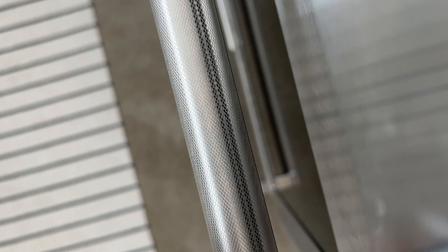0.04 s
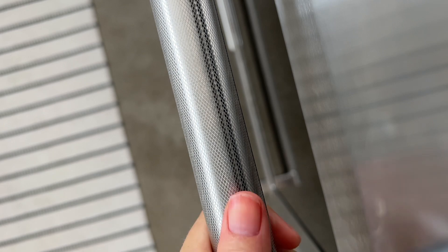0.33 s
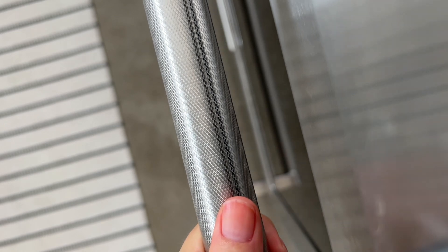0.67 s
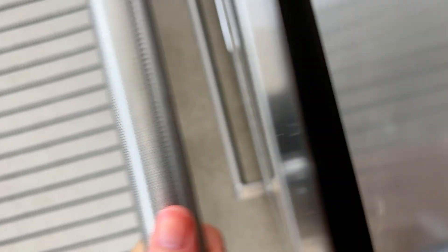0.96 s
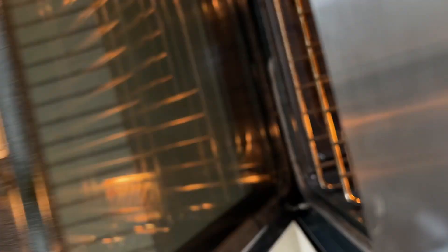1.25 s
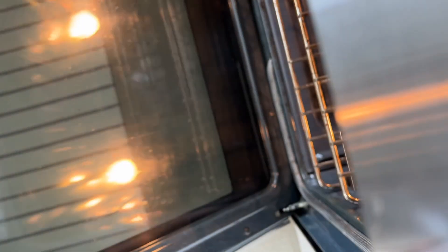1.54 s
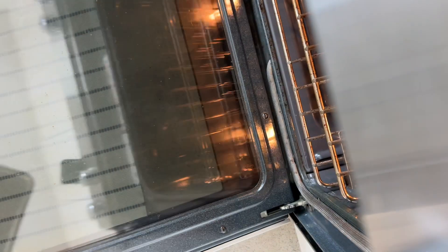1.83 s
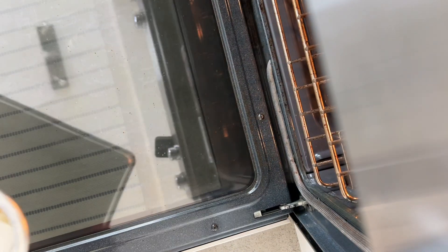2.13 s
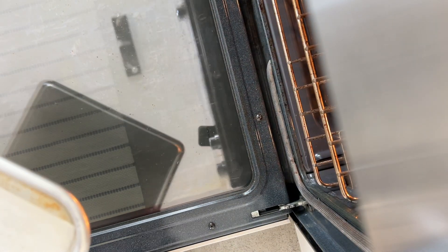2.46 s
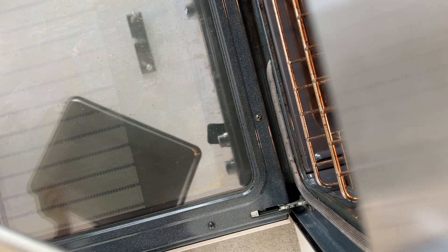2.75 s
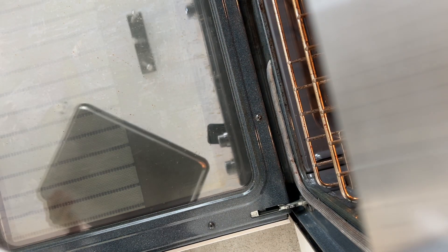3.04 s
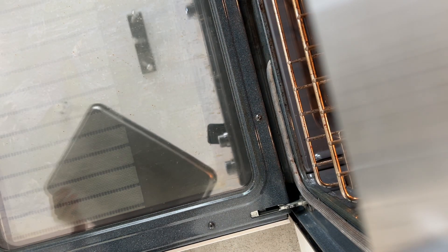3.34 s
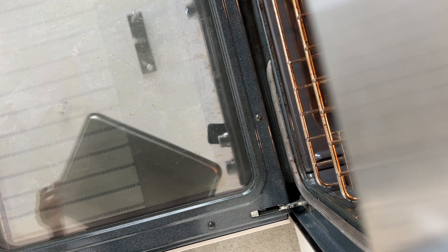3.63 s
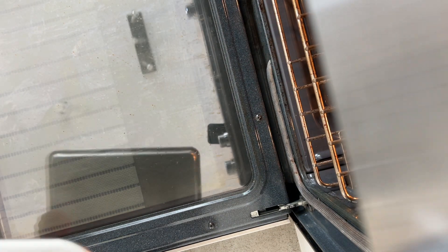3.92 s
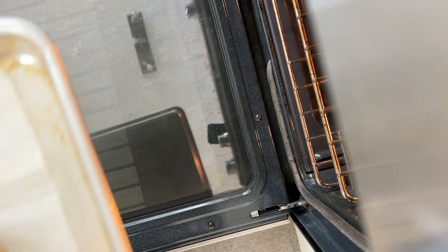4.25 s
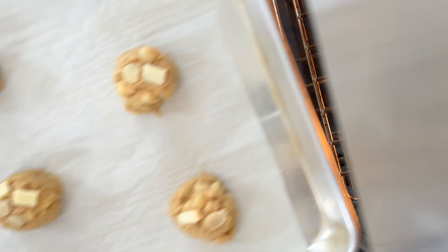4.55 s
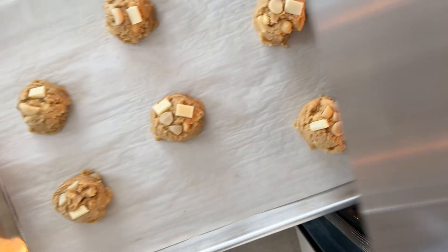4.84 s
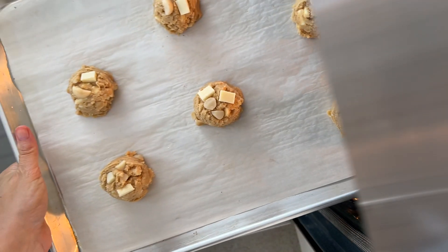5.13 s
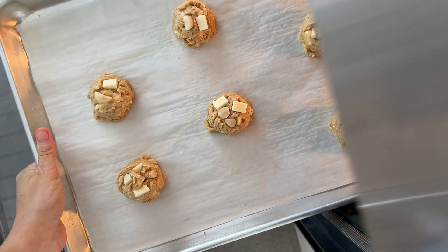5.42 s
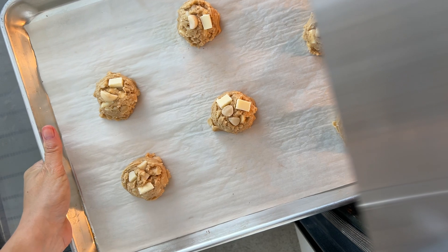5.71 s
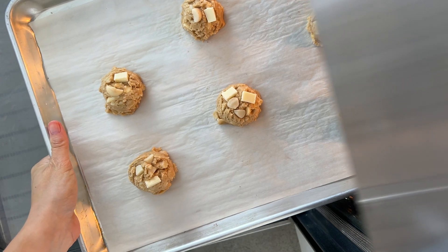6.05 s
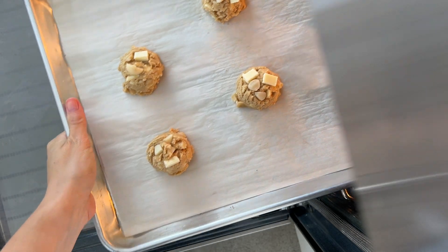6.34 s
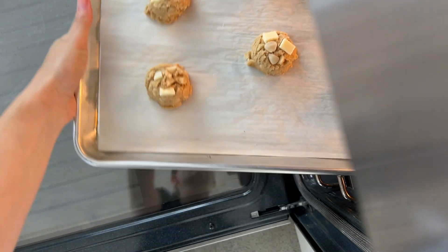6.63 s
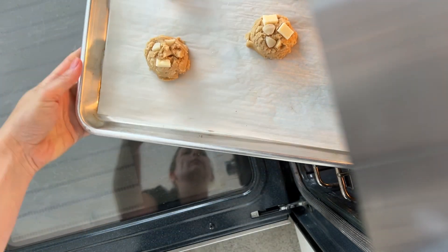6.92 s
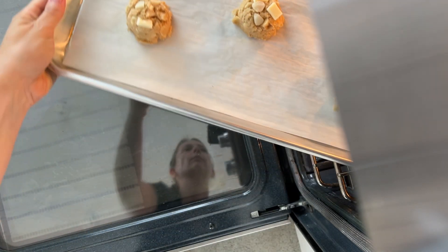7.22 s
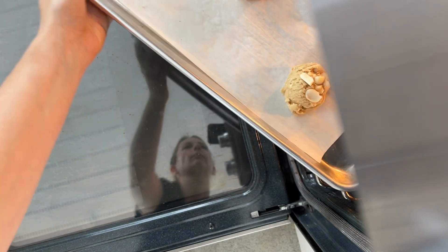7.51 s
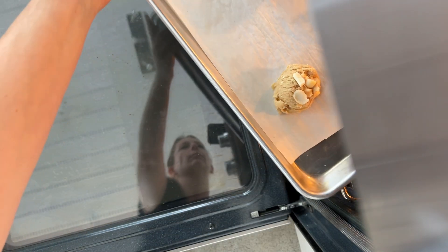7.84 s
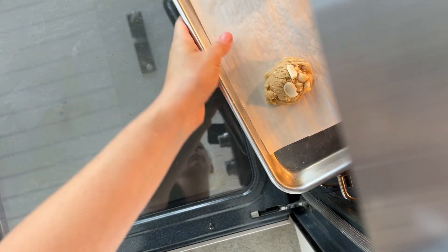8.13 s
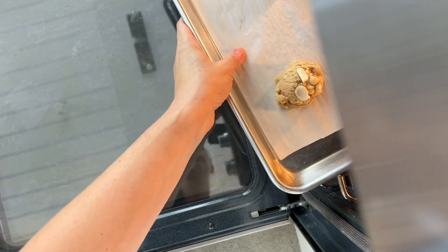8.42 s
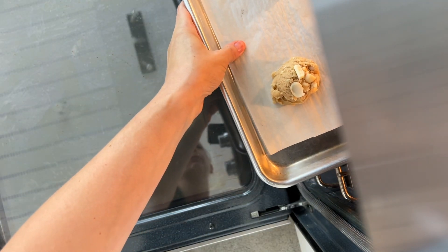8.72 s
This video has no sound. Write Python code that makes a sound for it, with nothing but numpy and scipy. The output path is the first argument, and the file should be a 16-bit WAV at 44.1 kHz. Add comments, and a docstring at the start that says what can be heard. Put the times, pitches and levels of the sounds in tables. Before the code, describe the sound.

A low fan noise and electrical hum fill a kitchen. Fingers rub a handle, and an oven door opens with knocks, a pop and a faint hinge whine. Sleeves swish, feet shuffle, and a baking pan is lifted with hollow knocks and a paper rustle. The pan clatters loudly onto the wire rack, bumps it twice and scrapes along the wires as it is pushed in, all close to the microphone.

```python
"""In a kitchen filled with fan noise and mains hum, fingers slide round the handle of an oven door.
Springs knock, the seal pops free and the hinge rubs and whines as the door swings open.
Sleeves swish close by, feet shuffle aside, and a baking pan is lifted with hollow knocks and a rustle
of paper. The pan clatters onto the wire rack, its sheet metal flexing and ringing between the oven's
steel walls; it scrapes along the wires, bumps the rack twice and is pushed home."""
import sys
import numpy as np
from scipy import signal
from scipy.fft import rfft, irfft, next_fast_len
from scipy.io import wavfile

SR = 44100
rng = np.random.default_rng(int(sys.argv[2]) if len(sys.argv) > 2 else 0)


def store_pcm(level_fs):
    """Save levels as 16-bit WAV."""
    pcm = np.round(np.clip(level_fs, -1, 1) * 32767).astype(np.int16)
    wavfile.write(sys.argv[1], SR, np.atleast_2d(pcm).T)


N = 395577
TIME = np.arange(N) / SR
OCTAVES_HZ = 50 * 2. ** np.arange(9)

# Envelopes of the fan noise and the mains hum: (time [s], level [dB])
FAN_LEVEL = [(0, -40.5), (2.9, -41.5), (3.2, -43), (4.2, -42.5), (4.4, -41.5), (5.4, -42.5), (8.97, -40)]
HUM_LEVEL = [(0, -41), (.7, -39.5), (1.9, -44), (2.2, -52), (3.2, -51.5), (4.2, -48), (5.2, -44.5),
             (8.97, -47)]
# Partials of the hum: (frequency [Hz], relative level [dB])
HUM_PARTIALS = [(120, 1.5), (240, -19.5), (361, -20), (480, -33)]

# Noise spectra: (frequency [Hz], relative spectral density [dB])
FAN_SPECTRUM = [(15, -29), (25, -26.5), (49, 8), (123, -8), (180, -16), (217, -15.5), (326, -19),
                (363, -14.5), (463, -17), (641, -20.5), (1230, -32.5), (7920, -63.5), (10400, -64.5),
                (12000, -63), (15000, -57), (16000, -77)]
GRIP_SPECTRUM = [(300, -4), (800, 1), (1600, -2.5), (3500, -7), (5200, -2), (6400, 1.5), (7500, -7.5),
                 (9000, -5), (12000, -10), (16000, -17)]
HINGE_SPECTRUM = [(200, -3.5), (500, 1.5), (1000, -0.5), (2000, -12), (3400, -18), (4500, -19),
                  (8000, -22.5), (15000, -31.5)]
SLEEVE_SPECTRUM = [(200, -2), (600, 13), (1500, 6), (3500, 2.5), (7000, 6), (9000, 2.5), (12500, 6),
                   (16000, -3)]
FLOOR_SPECTRUM = [(20, -10), (35, -7), (58, 2.5), (85, -12.5), (140, -15), (300, -37.5), (1000, -85),
                  (16000, -120)]
PAPER_SPECTRUM = [(200, -3), (1500, 3), (3500, -2.5), (7000, 4), (9000, 4.5), (12500, 6), (15000, 5),
                  (16000, 7.5)]
SLIDE_SPECTRUM = [(80, 22), (200, 13.5), (430, 0), (700, 8), (1200, 2), (2500, -4), (5000, -13),
                  (14000, -64.5)]
# Resonances excited by friction: (frequency [Hz], bandwidth [Hz], gain [dB])
HINGE_RESONANCES = [(4700, 1000, 2.8), (11400, 690, 8.2)]
SLEEVE_RESONANCES = [(6370, 140, 0.46), (8350, 230, 1.1)]
SLIDE_RESONANCES = [(336, 50, 14.5), (402, 40, 15.5), (490, 30, 7), (1150, 120, 5.5), (1650, 200, 1),
                    (2620, 1100, 4)]
# Rubbing strokes: (peak time [s], relative level [dB], rise [s], fall [s])
GRIP_STROKES = [(.12, -71, 0.018, 0.066), (.225, -45.5, 0.096, 0.12)]
HINGE_STROKES = [(.77, -52, 0.3, 0.12), (.895, -39.5, .012, 0.079), (1.08, -51.5, 0.27, 0.17),
                 (1.42, -55, .2, 0.6), (1.86, -53, .2, 0.36)]
SLEEVE_STROKES = [(1.86, -61.5, 0.14, 0.038), (2.56, -63.5, 0.034, 0.19), (2.92, -49, 0.12, 0.11),
                  (3.12, -48, 0.11, 0.1), (6.07, -60.5, 0.2, 0.61), (6.41, -48, 0.1, 0.36),
                  (6.76, -50.5, 0.13, 0.081), (7.06, -51, 0.085, 0.58), (7.48, -42, 0.04, 0.055),
                  (7.84, -46.5, 0.24, 0.16), (8.11, -57.5, 0.015, 0.056), (8.245, -53, .015, 0.03),
                  (8.33, -47.5, 0.039, 0.084), (8.96, -52.5, 0.4, .1)]
FOOT_STROKES = [(2.1, -37, 0.063, 0.15), (2.9, -35, 0.96, 0.19), (4.7, -41, 0.45, 0.94)]
PAPER_STROKES = [(3.555, -49.5, 0.11, .035), (3.632, -52, 0.03, 0.038), (3.715, -56, 0.04, 0.039),
                 (3.83, -47, 0.021, 0.073), (4.15, -58.5, 0.095, 0.22)]
PAN_PUSHES = [(5.95, -48.5, 0.14, 0.59), (6.42, -43.5, 0.44, 1), (7.24, -33.5, 0.1, 0.14),
              (7.43, -28.5, 0.032, 0.16), (7.82, -39, 0.28, 0.06), (8.33, -54.5, 0.082, 0.21),
              (8.93, -49, 0.32, 0.31)]
# Narrow friction bands of the hinge, and of the pan's rim on the wires:
# (time [s], duration [s], level [dB], start frequency [Hz], end frequency [Hz], bandwidth [Hz])
HINGE_WHINES = [(1.24, 0.069, -63, 4700, 4850, 150), (1.27, 0.18, -62, 11400, 11400, 450),
                (1.3, 0.27, -72, 4260, 4150, 70), (1.57, 0.18, -63, 11400, 11300, 600),
                (1.65, 0.15, -64, 4450, 4400, 120), (1.75, 0.094, -63.5, 11400, 11300, 700),
                (1.79, 0.22, -66, 4120, 3850, 330), (1.75, 0.48, -71.5, 4920, 5250, 200)]
RIM_SCRAPES = [(5.8, .35, -60.5, 3200, 2740, 600), (6.02, .4, -61, 2800, 2350, 450),
               (6.36, 0.12, -52, 1650, 1720, 220), (7.40, 0.15, -47, 1600, 1575, 160),
               (7.815, .04, -51, 1730, 1600, 500), (7.88, .05, -55, 1520, 1400, 700)]

# Snaps of fingers, sleeves and paper: (time [s], force [dB], tilt [dB/octave])
SNAPS = [(0.055, -16, -2.5), (0.102, 5.5, -8), (.621, -28.5, 2), (0.696, -26, 2), (0.905, -20, 4.5),
         (1.171, -22.5, 5), (1.269, -38, 5), (2.529, -5, -5.5), (2.635, -4.5, -4.5), (2.658, -0.5, -1.5),
         (2.682, -3, 1.5), (2.806, -11, 3), (2.822, -10, 3), (2.905, -6.5, 3), (2.973, -6, 0),
         (3.32, -40.5, 2.5), (4.405, -6.5, -7), (4.482, -28, -1), (4.496, -43, 7), (4.667, -15, -5.5),
         (5.007, -16.5, -14.5), (7.28, -19, 3.5), (8.241, -4, -1), (8.309, -3, 1.5), (8.322, 6, -1),
         (8.394, -7, 0), (8.806, -16, 1)]
# Impacts: (time [s], force [dB], bass gain [dB], tilt [dB/octave])
DOOR_KNOCKS = [(.568, -11.5, -57, 1.5), (.751, -21.5, 21.5, 1.5), (.886, -13, 0.5, -4),
               (1.148, -25.5, 6, 4.5), (1.172, -5, 23, 0.5), (1.505, 1, -2.5, 2.23), (1.510, -6.5, -19, -5),
               (1.994, -16.5, -18.5, 2.4)]
SEAL_POPS = [(.667, 1, -13.5, -3)]
LIFT_KNOCKS = [(3.476, 1, -8, -1.3), (4.040, -9, 9, 1), (4.517, -22, 4, 0), (5.008, -19, -3, 0.41)]
PAN_CLANKS = [(5.440, 0, -0.5, 0), (5.480, -2, -5, -0.1), (5.508, -15, 7, -2.2), (5.530, -11.5, -7, -0.7),
              (5.564, -2.5, -16, 0.4), (5.576, -15, -8, 2), (5.603, -6.5, 4, -0.6), (5.642, -8, 1, 0.4),
              (5.744, -14.5, -5, -0.3), (5.825, -21.5, 1.5, -2), (5.884, -26, -5.5, -5),
              (5.924, -22.5, 7, -1), (6.354, -38, -9.5, -5), (6.408, -24, -14, 0.3),
              (7.399, -12.5, -7, 0.5), (7.435, -20.5, 24, 1.7), (7.485, -9, -3, 1), (7.492, -22, -2, -4),
              (7.524, -16.5, -12.5, -6.5), (7.563, -17, -1, -1.5), (7.827, -18.5, 1, -0.5),
              (7.895, -20.5, -1, -0.5), (7.992, -26.5, 16, 1.5), (8.025, -36, 5, -2.5),
              (8.103, -30, -5, -3)]
RACK_BUMPS = [(6.690, -1.9, 2, 0.203), (7.081, 0.38, 0.42, 0.92)]
# Dense response of each struck body, by band: (frequency [Hz], relative level [dB], tail T60 [s])
SNAP_BANDS = [(100, -55, 0.19), (400, -81, 0.35), (1600, -56, 0.23), (3120, -55.5, 0.33),
              (6830, -44.5, 0.28), (12940, -45.5, 0.087)]
DOOR_BANDS = [(51.6, -53, 0.88), (101, -40.5, 0.44), (200, -45, 0.97), (403, -37, 0.4), (800, -34.5, 0.57),
              (1590, -39, 0.66), (3200, -46, 0.68), (6350, -51, 0.53), (12900, -60.5, 0.19)]
SEAL_BANDS = [(49, -62, .3), (104, -34.5, 1), (200, -43.5, 1), (400, -44.5, 1), (795, -44, 0.76),
              (1580, -44.5, 0.71), (3200, -56.5, .3), (6400, -60, 0.82), (12800, -57.5, 0.44)]
LIFT_BANDS = [(100, -80, .3), (200, -47, 0.14), (400, -49, 1), (800, -48.5, 0.48), (1630, -53, 0.61),
              (3200, -64, 0.27), (6400, -70.5, .2), (12900, -61, .2)]
PAN_BANDS = [(51, -50, .3), (99, -31, 0.98), (200, -31.5, 0.77), (400, -29, 0.32), (797, -29.5, 0.73),
             (1600, -30, 0.46), (3200, -34, 0.51), (6400, -36, 0.43), (12700, -32.5, 0.16)]
RACK_BANDS = [(52, -48, 0.43), (106, -36, 0.65), (200, -31, 0.65), (400, -31, 1), (757, -28, 0.65),
              (1600, -32, 0.47), (3200, -34, 0.39), (6400, -45.5, 0.33), (12700, -38, 0.13)]
# Its strongest normal modes: (frequency [Hz], relative level [dB], T60 [s])
SNAP_MODES = [(5140, -40.5, 0.062), (7780, -39, 0.041), (8350, -39.5, 0.033), (13150, -46, 0.034)]
DOOR_MODES = [(193, -46, .45), (456, -30.5, 0.25), (549, -48, 0.5), (800, -35, 0.39), (622, -37, 0.6),
              (911, -33, 0.15), (1160, -35, 0.38), (1190, -58, 0.3), (1880, -36, 0.1), (2616, -52, 0.24),
              (3520, -48.5, 0.32), (3790, -43, .1), (5070, -47, 0.083)]
SEAL_MODES = [(200, -37, 0.79), (800, -32, 0.19), (890, -30, 0.12), (1305, -31, 0.086),
              (1860, -19.5, 0.025)]
LIFT_MODES = [(246, -36.5, 0.32), (292, -29, 0.16), (330, -35.5, 0.34), (937, -56, 0.19), (2000, -59, .25)]
PAN_MODES = [(155, -37.5, 1.6), (197.7, -32.5, 0.4), (284, -36.5, 0.82), (305.5, -22, 0.13),
             (352, -40.5, 1.4), (386, -42.5, 2.65), (440, -37.5, 2.2), (459, -28.5, 0.49), (489, -37, 1.15),
             (620, -47, .7), (664, -47, .9), (734, -49, .6), (1008, -42.5, 1.4), (1180, -45.5, 1.9),
             (1280, -54, 1), (1475, -47.5, 0.6), (1583, -40, 0.5), (2308, -51, .6)]
RACK_MODES = [(98.4, -25.5, 0.76), (196, -19.5, 0.49), (326, -20.5, 0.39), (373, -25, 0.53),
              (456, -24.5, 0.37), (510, -29, 0.35), (813, -30.5, 0.57), (1010, -26.5, 0.14),
              (1035, -33, 0.53), (2024, -33.5, 0.23), (2100, -29, 0.1), (2430, -22.5, 0.058),
              (2850, -26.5, .06), (3150, -42.5, .4), (3620, -38, 0.1), (4059, -47, 0.23),
              (6080, -37, 0.075), (6740, -36.5, .09)]

# Thuds of feet and of the swinging door: (time [s], level [dB], frequency [Hz], twice the rise time [s])
THUDS = [(0.735, -27, 94, 0.017), (0.826, -27, 126, 0.031), (0.894, -28, 71.3, 0.047),
         (1.181, -35, 71.5, 0.21), (1.232, -21.5, 74, 0.029), (1.241, -31, 124.7, 0.044),
         (2.362, -17, 97, 0.0074), (2.695, -19, 79.5, 0.023), (2.768, -19.5, 64.5, 0.0069),
         (3.994, -33.5, 101, 0.01), (8.009, -31.5, 72.5, 0.019)]
# Squeaks of fingers and wires on the pan: (time [s], level [dB], frequency [Hz])
PAN_SQUEAKS = [(4.403, -56, 1650), (4.416, -50.5, 1540), (4.478, -45, 1480), (4.492, -54, 1510),
               (7.99, -44.5, 1860)]
# Flexing of the sheet: (time [s], level [dB], start frequency [Hz], end frequency [Hz], rise [s])
PAN_FLEXES = [(5.44, -13, 510, 275, 0.0055), (5.480, -15.5, 594, 353, 0.0031),
              (5.505, -13.5, 200, 100, 0.0043), (5.564, -16.5, 584, 332, 0.004),
              (5.602, -21.5, 410, 164, 0.009), (5.64, -18, 600, 400, .004),
              (6.693, -14.5, 478, 83.4, 0.0134), (6.777, -19, 130, 89, 0.015),
              (7.084, -13, 478, 263, 0.0064), (7.101, -13, 200, 88, 0.0062)]

# Likeness of the two microphone ports: (frequency [Hz], coherence [0-1])
PORT_COHERENCE = [(60, 0.97), (130, 0.66), (350, 0.9), (550, 1), (900, 0.27), (1300, 1), (2000, 0.35),
                  (3000, 0.65), (3900, 0.096), (5000, 0.07), (6000, 0.12), (8000, 0.94), (12000, 1),
                  (16000, 0.56)]
# Left port relative to right: (frequency [Hz], level [dB]) and (frequency [Hz], phase lead [rad])
PORT_BALANCE = [(50, -1), (130, -0.5), (220, 0), (400, 1.5), (900, 1.5), (1300, 1), (3200, 1), (5500, 5),
                (9000, 0), (15000, -1)]
PORT_PHASE = [(40, .1), (100, 0.53), (220, 0.99), (350, 0.99), (520, 0.97), (700, 2.33), (1000, 4.12),
              (1500, 4.54), (2300, 7.6), (3500, 7), (4100, 24), (5000, 13), (6400, 20.4), (7200, 18.9),
              (8000, 17.94), (9500, 15.75), (11500, 14.67), (13000, 9.2), (16000, 12)]
# The microphone's treble notch: (frequency [Hz], gain [dB])
MIC_NOTCH = [(8300, -2.5), (9100, -0.5), (9700, -6), (10300, -20), (10900, 1.5), (11500, -0.5)]


def amp(db):
    """Decibels as an amplitude ratio."""
    return 10 ** (np.asarray(db) / 20)


def unit_rms(x):
    """Normalisation to unit power."""
    return x / np.sqrt(np.mean(x ** 2) + 1e-20)


def read(points, hz, column=1):
    """Interpolation of a table column over log frequency."""
    table = np.transpose(points)
    return np.interp(np.log(hz + 1), np.log(table[0] + 1), table[column])


def envelope(curve):
    """Gain over time, interpolated in decibels."""
    return amp(np.interp(TIME, *np.transpose(curve), left=-120, right=-120))


def add(mix, s, sound):
    """Superposition of a sound starting at s seconds."""
    part = mix[:, max(round(s * SR), 0):][:, :sound.shape[-1]]
    part += sound[..., :part.shape[1]]


def coloured(x, spectrum, resonances=()):
    """Linear filtering by a spectrum with resonance peaks standing on it."""
    size = next_fast_len(N + 4096)
    hz = np.fft.rfftfreq(size, 1 / SR)
    peaks_db = sum(db / (1 + (2 * (hz - f) / width) ** 2) for f, width, db in resonances)
    return irfft(rfft(x, size) * amp(read(spectrum, hz) + peaks_db), size)[:, :N]


def drift(rate_hz):
    """Slow random modulation of about unit size."""
    knots = np.arange(0, 10, 1 / rate_hz)
    return np.interp(TIME, knots, rng.standard_normal(4096)[:len(knots)])


def octave_noise(size=65536):
    """Noise split into octave bands of unit power, indexed by band, channel and sample."""
    octave = np.log2(np.fft.rfftfreq(size, 1 / SR) / OCTAVES_HZ[0] + 1e-6)
    offset = np.clip(octave, -1, len(OCTAVES_HZ) - 1) - np.arange(len(OCTAVES_HZ))[:, None]
    shares = np.cos(np.pi / 2 * np.clip(offset, -1, 1))
    noise = rfft(rng.standard_normal((2, size), dtype=np.float32))
    return np.array([unit_rms(irfft(noise * share)) for share in np.float32(shares)])


def struck(blows, bands, modes, crack_t60, tail_db, rise_cycles, modes_db=0, detune=0, rattle_hz=0):
    """Impact excitation: each blow gives a crack, a dense tail of panels and room, and damped modes."""
    t, noise, out = np.arange(SR) / SR, octave_noise(), np.zeros((2, N))
    hz = OCTAVES_HZ[:, None]
    crack = amp(-60 * t / (crack_t60 * (1000 / hz) ** 0.06))  # the treble dies first
    tail = amp(tail_db - 60 * t / read(bands, hz, column=2))
    shape = np.hypot(crack, tail) * (1 - np.exp(-t * hz / rise_cycles))  # the bass builds up later
    onset_rms = np.sqrt(np.mean(shape[:, :SR // 25] ** 2, 1, keepdims=True))
    shape *= amp(read(bands, hz)) / onset_rms
    touches = np.arange(0, 1, .012)
    for s, force_db, bass_db, tilt_db in blows:
        def strength(f):
            return amp(force_db + bass_db / (1 + (f / 230) ** 3) + tilt_db * np.log2(f / 1000))
        start = int(rng.random() * (noise.shape[-1] - SR))
        sound = np.einsum("bt,bct->ct", shape * strength(hz), noise[..., start:start + SR])
        for f, db, t60 in modes:
            age = t[:int(t60 * SR)]
            # the higher a mode, the more it matters where the blow lands
            spot_db = np.clip(f / 400, 1, 4) * rng.uniform(-1.48, 1)
            ring = amp(db + modes_db + spot_db - 60 * age / t60) * (1 - np.exp(-age * f / rise_cycles))
            pitch = f * (1 + detune * rng.uniform(-0.95, 1))
            jitter = rattle_hz * np.interp(age, touches, rng.standard_normal(len(touches)))
            cycles = np.cumsum(pitch + jitter) / SR + rng.random((2, 1))
            sound[:, :len(age)] += strength(f) * ring * np.sin(2 * np.pi * cycles)
        add(out, s, sound)
    return out


def strokes(rows, drop_db=11.5, roundness=1.3):
    """Incoherent strokes add in power; each is drop_db down one rise before and one fall after its peak."""
    t = np.linspace(0, TIME[-1], 4096)
    s, db, rise, fall = np.transpose(rows)[:, :, None]
    from_peak = np.maximum((s - t) / rise, (t - s) / fall)
    gains = amp(db - drop_db * from_peak ** roundness)
    return np.interp(TIME, t, np.linalg.norm(gains, axis=0))


def friction(spectrum, resonances, slips_per_s, slip_db, flutter_db, flutter_hz):
    """Friction noise: tiny slips of uneven size over a fine hiss, under fluttering contact pressure."""
    sizes = amp(3.5 * np.minimum(rng.exponential(1, N), 3.5))
    slipping = rng.random(N) < slips_per_s / SR
    slips = unit_rms(sizes * slipping * rng.choice([-1., 1.], (2, N)))
    drive = rng.standard_normal((2, N), dtype=np.float32) + amp(slip_db) * slips
    return unit_rms(coloured(drive, spectrum, resonances)) * amp(flutter_db * drift(flutter_hz))


def fan_and_hum():
    """A continuous spectrum from fan and room lies under the wavering line spectrum of the mains."""
    air = unit_rms(coloured(rng.standard_normal((2, N)), FAN_SPECTRUM))
    clock = TIME + 0.00092 * drift(3)
    hum = sum(amp(db) * np.exp(2j * np.pi * (hz * clock + rng.random())) for hz, db in HUM_PARTIALS)
    return envelope(FAN_LEVEL) * air + envelope(HUM_LEVEL) * unit_rms(np.array([hum.real, -hum.imag]))


def snaps():
    """Small impulses from fingers, sleeves and paper excite high, heavily damped modes."""
    blows = [(s, force_db, 0, tilt_db) for s, force_db, tilt_db in SNAPS]
    ticks = struck(blows, SNAP_BANDS, SNAP_MODES, crack_t60=0.022, tail_db=-14, rise_cycles=4.1)
    return signal.sosfilt(signal.butter(2, 500, "high", fs=SR, output="sos"), ticks)


def handle_grip():
    """Sliding friction of fingers round the ribbed handle."""
    rub = friction(GRIP_SPECTRUM, [], 1000, slip_db=-7.5, flutter_db=2.5, flutter_hz=59.3)
    return strokes(GRIP_STROKES) * rub


def door_knocks():
    """Knocks of the springs set the door into free vibration."""
    return struck(DOOR_KNOCKS, DOOR_BANDS, DOOR_MODES,
                  crack_t60=0.096, tail_db=-10, rise_cycles=1.8, modes_db=-1)


def oven_cavity(x, from_hz=900, echo_db=-9, t60=.04, shift_s=.4):
    """Comb filtering: quick echoes off the steel walls colour the treble, shifting as things move."""
    t, hop, out = np.arange(2048) / SR, round(shift_s * SR), np.zeros((2, N))
    no_bass = signal.butter(2, from_hz, "high", fs=SR, output="sos")
    fade = signal.get_window("hann", 2 * hop)
    for start in range(0, N, hop):
        echoes = signal.sosfilt(no_bass, rng.standard_normal(len(t)) * amp(-60 * t / t60) * (t > .001))
        response = (amp(echo_db) * echoes / np.linalg.norm(echoes) + (t == 0)) / np.hypot(1, amp(echo_db))
        part = x[:, start:start + 2 * hop]
        add(out, start / SR, signal.fftconvolve(part * fade[:part.shape[1]], response[None], axes=1))
    return out


def seal_pop():
    """The sudden release of the seal acts as an impulse."""
    return struck(SEAL_POPS, SEAL_BANDS, SEAL_MODES, crack_t60=0.091, tail_db=-5.5, rise_cycles=1.3)


def hinge_rub():
    """Friction drives the hinge's resonances at each stage of the swing."""
    rub = friction(HINGE_SPECTRUM, HINGE_RESONANCES, 300, slip_db=-28, flutter_db=2, flutter_hz=45.75)
    return strokes(HINGE_STROKES) * rub


def thuds():
    """Damped oscillation of the floor: a few cycles of bass swell and die."""
    t, out = np.arange(SR // 2) / SR, np.zeros((2, N))
    for s, db, hz, length in THUDS:
        age = 2 * t / length
        cycles = hz * t + np.array([[0], [rng.random()]])
        add(out, s, amp(db) * age * np.exp(1 - age) * np.sin(2 * np.pi * cycles))
    return out


def hinge_chirp(start_s=.885, db=-41, hz=13500, width_hz=2600, t60=.11):
    """A very high resonance squeaks once and decays exponentially as the hinge starts to turn."""
    age = np.maximum(TIME - start_s, 0)
    band = coloured(rng.standard_normal((2, N)), [(20, 0), (20000, 0)], [(hz, width_hz, 40)])
    return amp(db - 60 * age / t60) * (1 - np.exp(-age / 0.0013)) * unit_rms(band)


def metal_whines(rows):
    """Friction-excited vibration: rubbed metal sings in a narrow band that swells, glides and fades."""
    out = np.zeros((2, N))
    for s, length, db, first_hz, last_hz, width_hz in rows:
        noise = rng.standard_normal((2, SR)) + 1j * rng.standard_normal((2, SR))
        size = int(length * SR)
        waver = signal.sosfilt(signal.butter(2, width_hz / 2, fs=SR, output="sos"), noise[:, :size])
        carrier = np.exp(2j * np.pi * np.cumsum(np.linspace(first_hz, last_hz, size)) / SR)
        add(out, s, amp(db) * np.sqrt(np.hanning(size)) * unit_rms((waver * carrier).real))
    return out


def sleeves():
    """Friction of cloth swishes with each move of the arms."""
    rub = friction(SLEEVE_SPECTRUM, SLEEVE_RESONANCES, 900, slip_db=-26, flutter_db=3, flutter_hz=45.7)
    return amp(3) * strokes(SLEEVE_STROKES) * rub


def shuffles():
    """Structure-borne noise: the floor rumbles under shifting feet."""
    return strokes(FOOT_STROKES) * unit_rms(coloured(rng.standard_normal((2, N)), FLOOR_SPECTRUM))


def pan_lift():
    """Damped low modes knock hollowly as the pan is lifted."""
    return struck(LIFT_KNOCKS, LIFT_BANDS, LIFT_MODES, crack_t60=0.062, tail_db=-10, rise_cycles=0.42)


def baking_paper():
    """Friction of slipping paper gives a bright, grainy rustle."""
    rub = friction(PAPER_SPECTRUM, [], 900, slip_db=-12, flutter_db=3.5, flutter_hz=61.6)
    return strokes(PAPER_STROKES) * rub


def pan_squeaks(length_s=0.015, sag=0.068, roughness=0.052, overtone_db=-10):
    """Stick-slip motion gives brief, unsteady tones that sag in pitch."""
    t, out = np.arange(0, length_s, 1 / SR), np.zeros((2, N))
    for s, db, hz in PAN_SQUEAKS:
        phase = 2 * np.pi * (hz * t * (1 - sag * t / length_s / 2) + rng.random())
        phase += roughness * np.cumsum(rng.standard_normal(len(t)))
        tone = np.sin(phase) + amp(overtone_db) * np.sin(2 * phase)
        add(out, s, amp(db) * np.hanning(len(t)) * tone)
    return out


def pan_clatter():
    """Loose contact with the wires detunes and jitters the pan's modes at each impact."""
    return struck(PAN_CLANKS, PAN_BANDS, PAN_MODES, crack_t60=0.036, tail_db=-10,
                  rise_cycles=0.41, modes_db=2.5, detune=.008, rattle_hz=9)


def pan_flexes(glide=0.73):
    """Dispersion: after a hard blow the fast bending waves arrive first, so the thump falls in pitch."""
    t, out = np.arange(SR // 4) / SR, np.zeros((2, N))
    for s, db, first_hz, last_hz, rise in PAN_FLEXES:
        age = t / rise
        hz = last_hz + (first_hz - last_hz) * np.exp(-age / glide)
        thump = amp(db) * age * np.exp(1 - age) * np.sin(2 * np.pi * np.cumsum(hz) / SR)
        add(out[:1], s, thump)  # direct sound only
    return out


def pan_slide():
    """Sliding friction along the wires drives the pan's resonances while its rim scrapes."""
    rub = friction(SLIDE_SPECTRUM, SLIDE_RESONANCES, 350, slip_db=-7.5, flutter_db=2.5, flutter_hz=47.7)
    return strokes(PAN_PUSHES) * rub + metal_whines(RIM_SCRAPES)


def rack_bumps():
    """Two impacts of the pan excite the modes of the rack, loose in its runners."""
    return struck(RACK_BUMPS, RACK_BANDS, RACK_MODES, crack_t60=0.054, tail_db=-9.5,
                  rise_cycles=0.38, modes_db=2, detune=.008, rattle_hz=9)


def mic_ports(x):
    """Partial coherence: both ports share the first channel of x; the second is the diffuse field."""
    size = next_fast_len(N + 4096)
    hz = np.fft.rfftfreq(size, 1 / SR)
    shared, diffuse = rfft(x, size)
    coherence, lean = read(PORT_COHERENCE, hz), amp(read(PORT_BALANCE, hz) / 2)
    lag = np.exp(-1j * read(PORT_PHASE, hz))
    right = coherence * lag * shared + np.sqrt(1 - coherence ** 2) * diffuse
    return irfft(np.array([shared * lean, right / lean]), size)[:, :N]


def scene(pan_left_db=1.5):
    """Superposition of all sources; a level difference places the pan a little to the left."""
    impacts = seal_pop() + door_knocks()
    door = hinge_rub() + oven_cavity(impacts) + metal_whines(HINGE_WHINES) + hinge_chirp()
    person = handle_grip() + sleeves() + baking_paper() + snaps() + thuds() + shuffles()
    around = mic_ports(door + person + fan_and_hum()) + pan_squeaks()
    pan = pan_lift() + pan_clatter() + pan_flexes() + rack_bumps() + pan_slide()
    return around + mic_ports(oven_cavity(pan)) * amp([[pan_left_db / 2], [-pan_left_db / 2]])


def record(dry, cutoff_hz=15950):
    """The microphone's frequency response: a treble notch, then a band limit."""
    lowpass = signal.firwin(255, cutoff_hz, window=("kaiser", 9), fs=SR)
    return signal.oaconvolve(coloured(dry, MIC_NOTCH), lowpass[None], "same")


dry = scene()
out = record(dry)
store_pcm(out)
```